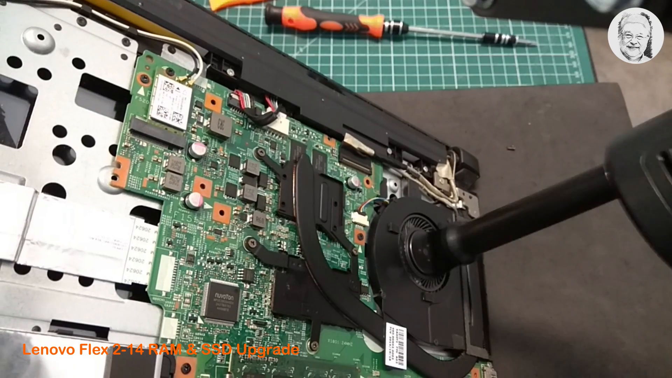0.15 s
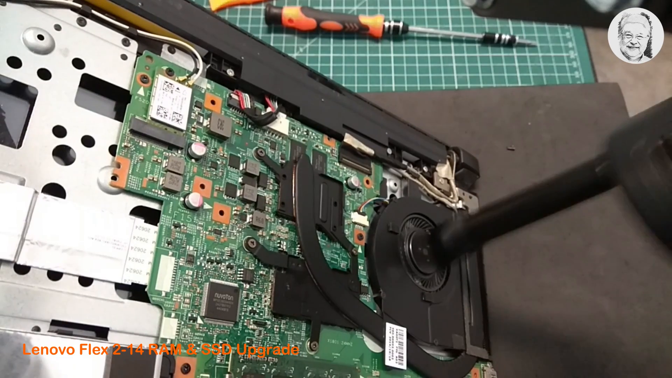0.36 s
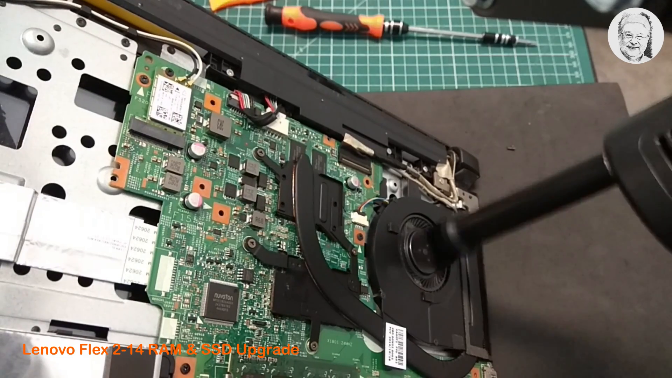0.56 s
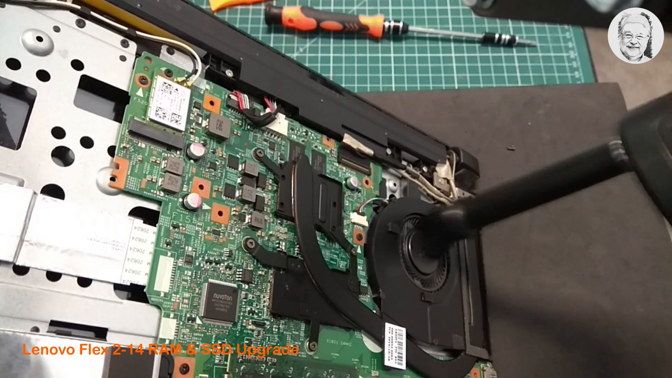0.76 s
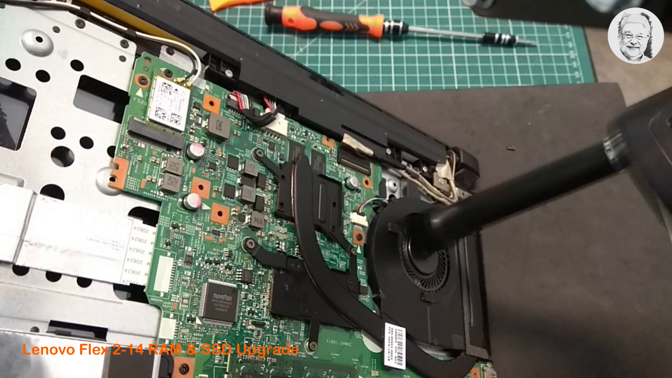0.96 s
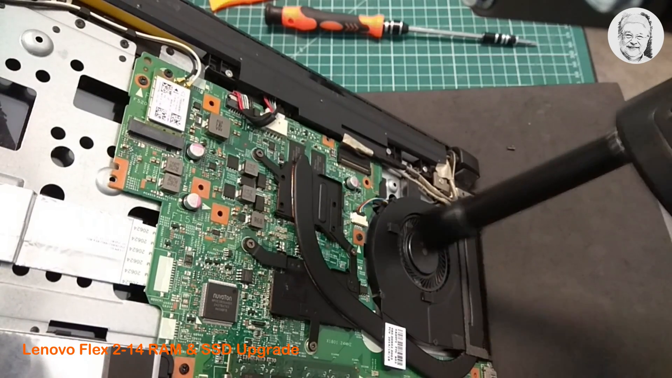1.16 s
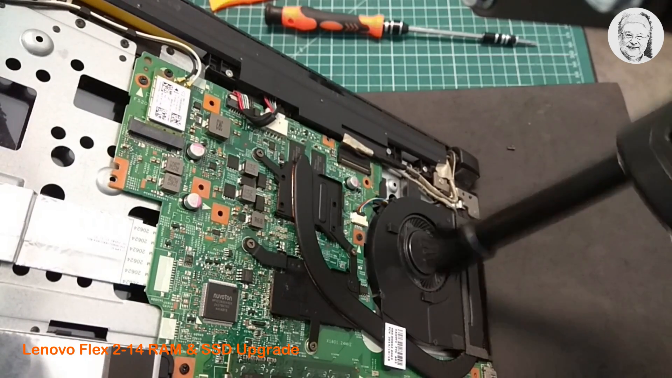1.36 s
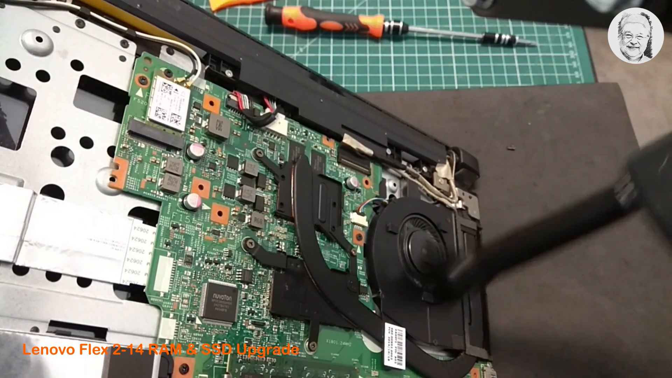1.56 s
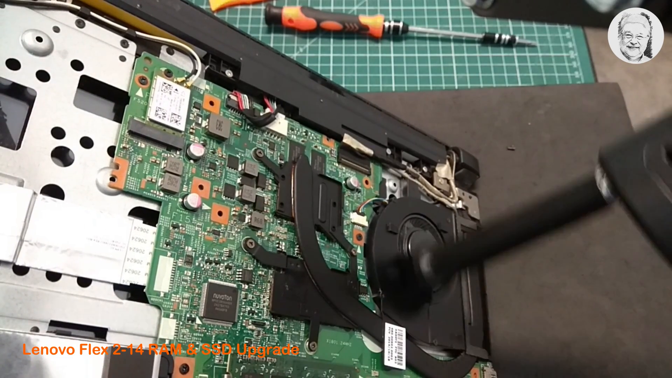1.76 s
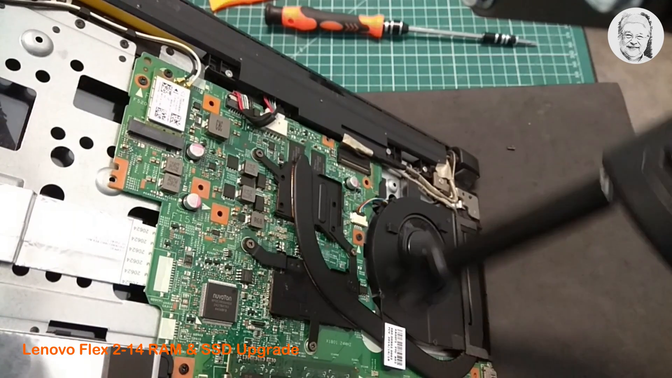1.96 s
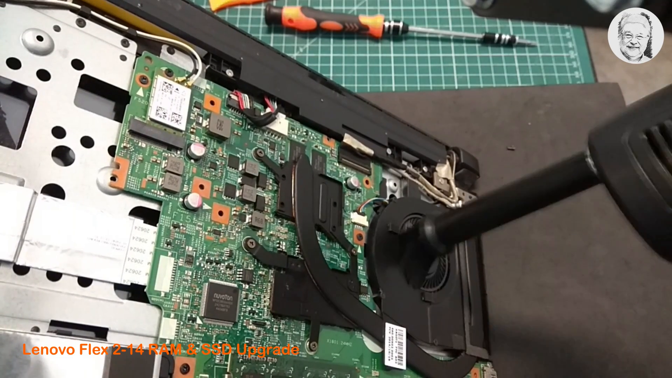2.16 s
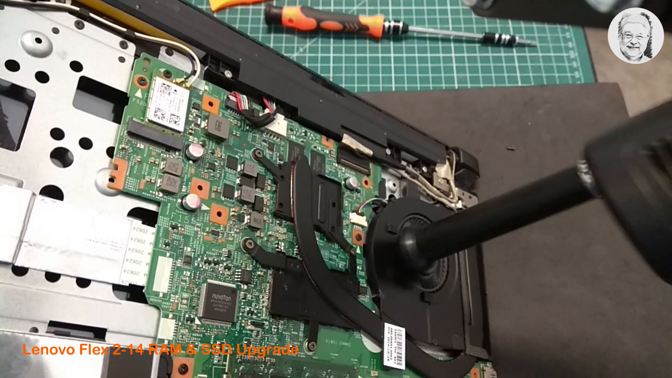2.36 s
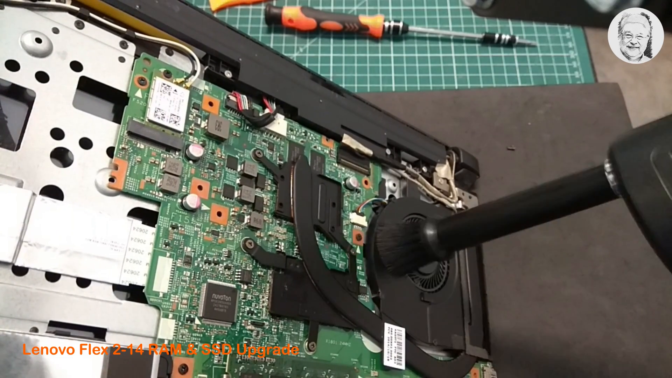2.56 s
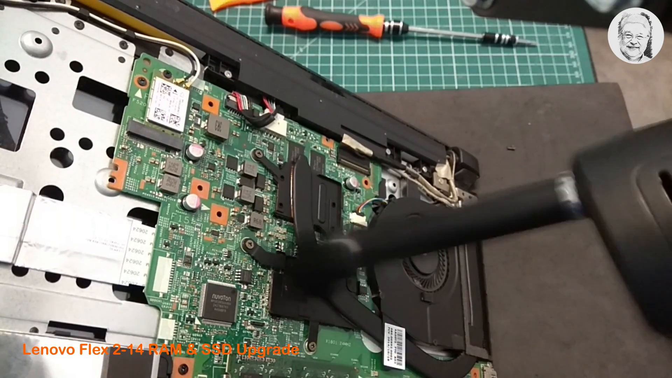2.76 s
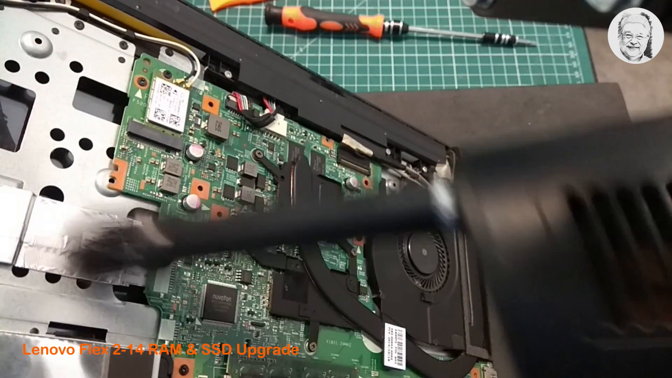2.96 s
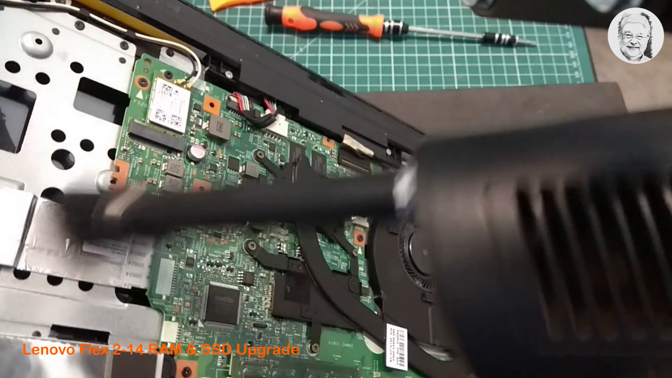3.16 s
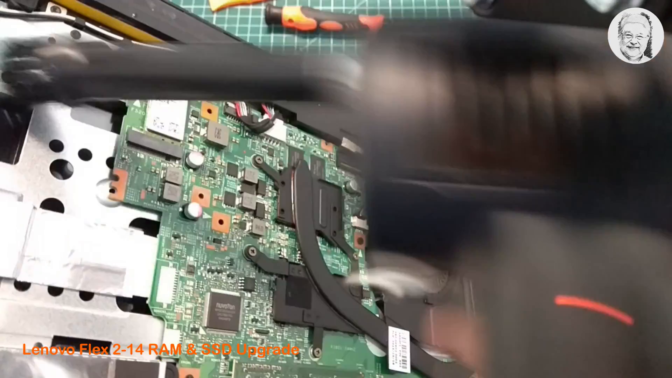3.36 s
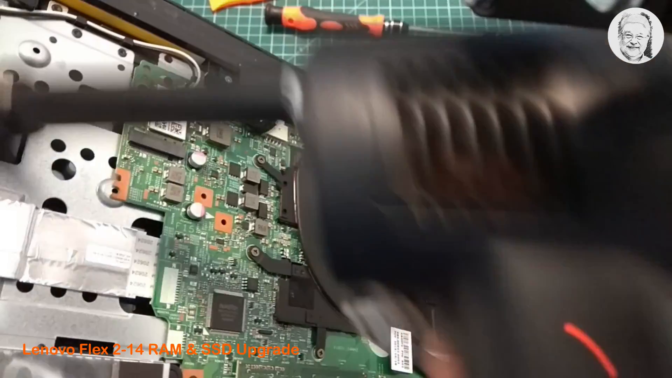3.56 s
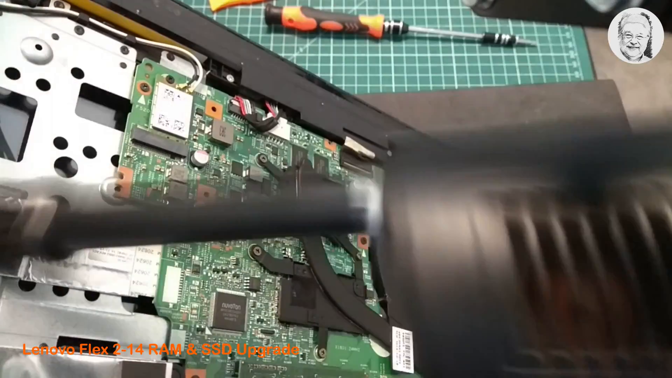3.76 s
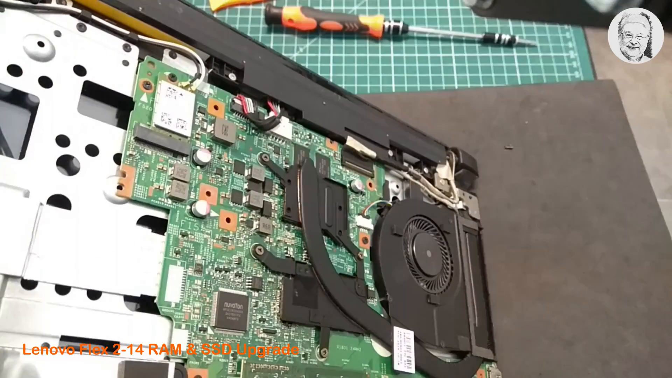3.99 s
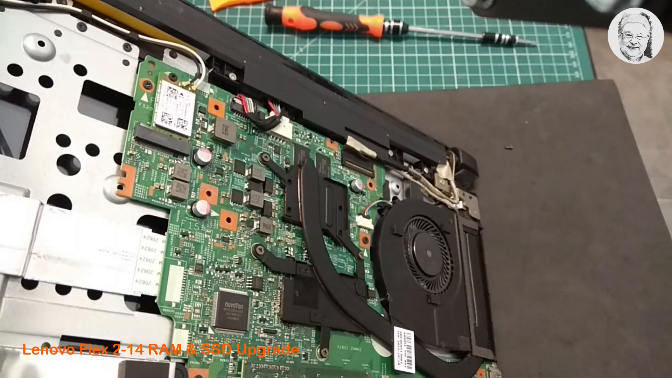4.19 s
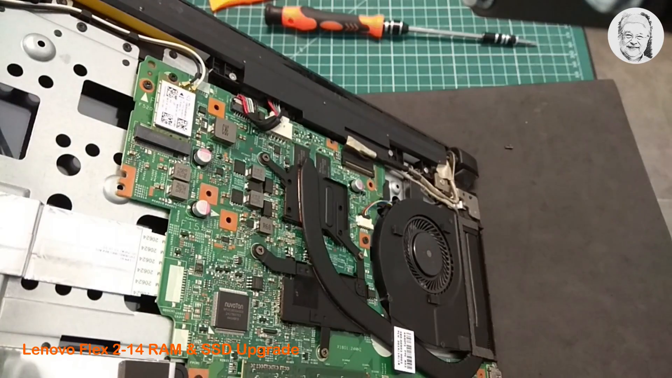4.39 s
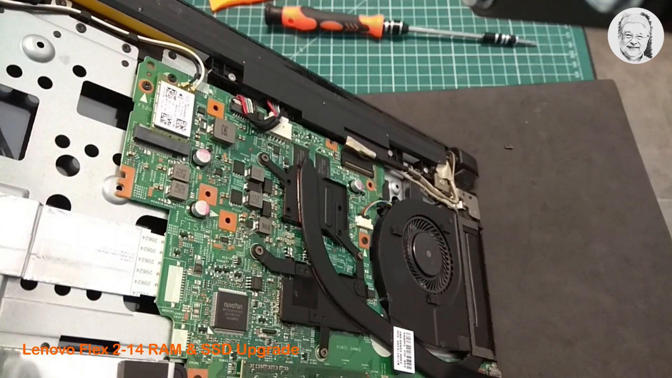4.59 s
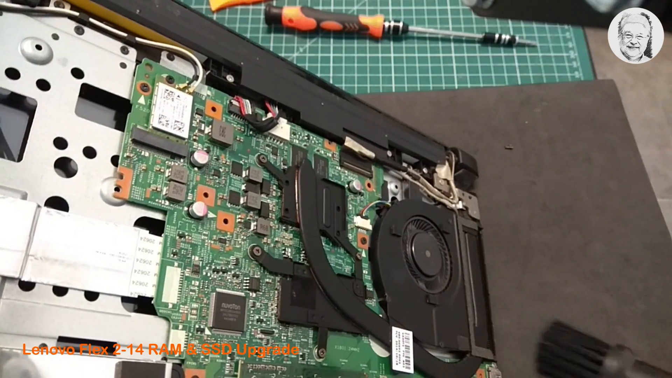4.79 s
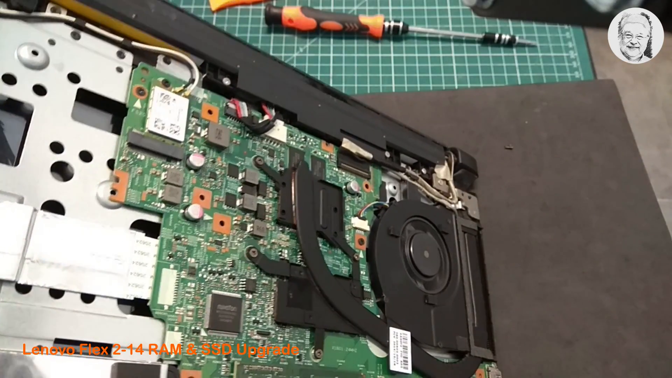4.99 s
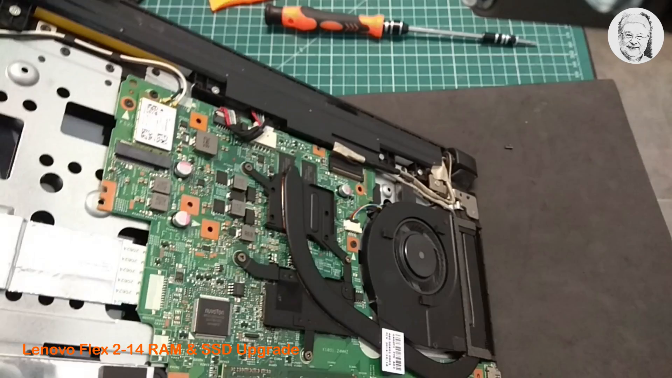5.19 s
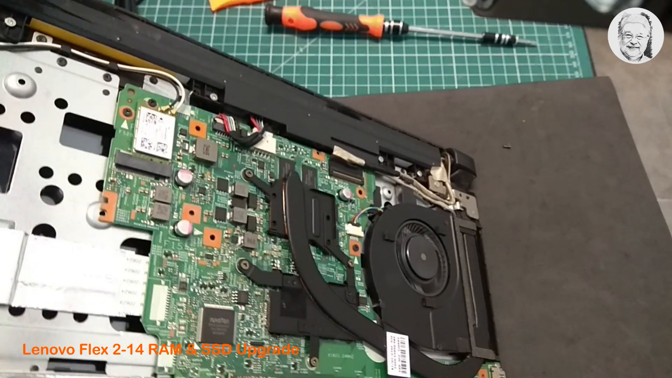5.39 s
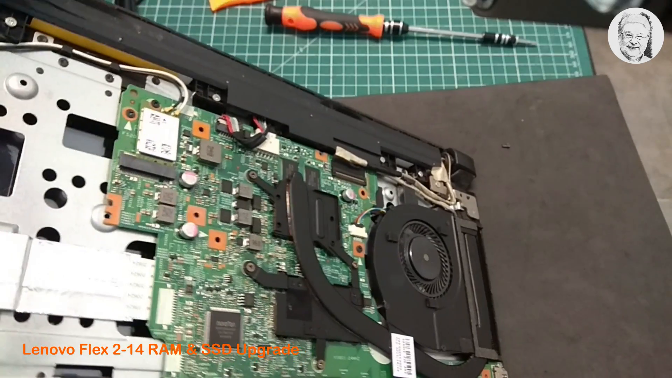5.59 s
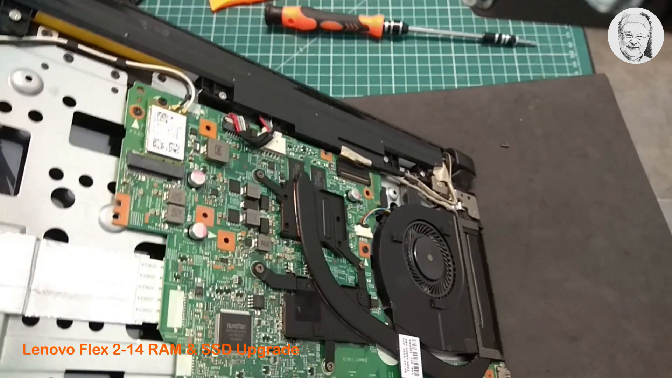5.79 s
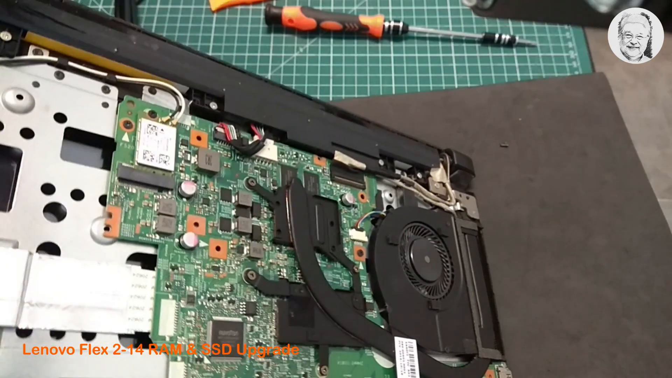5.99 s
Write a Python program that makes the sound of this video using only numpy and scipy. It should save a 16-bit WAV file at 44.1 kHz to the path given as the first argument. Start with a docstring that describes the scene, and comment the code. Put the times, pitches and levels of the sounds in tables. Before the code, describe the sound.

A strong, hissy jet of turbulent air runs continuously, threaded with a very high, slightly wavering motor whine and weaker lower tones. Recorded close in stereo indoors, it shifts between sides and sounds briefly hollow as the blower moves over an opened laptop. Near the end the power cuts, the motor slides down and is braked, and the air dies away, leaving a soft rumble, two minute chirps and two fading whistles.

```python
"""A loud rush of air with a motor whine in it: a hand-held electric blower dusts an opened laptop.
The rush is random noise with a shifting colour; the whine is sines on multiples of the shaft's speed.
The blower is swept across two microphones, drawn back to the side and switched off; its shaft coasts down
and is braked, with a short low rumble, two tiny squeaks and two thin falling whistles (noise and sines)."""
import sys
import numpy as np
from scipy import signal
from scipy.io import wavfile
from scipy.ndimage import uniform_filter1d

SR = 44100
rng = np.random.default_rng(int(sys.argv[2]) if len(sys.argv) > 2 else 0)


def wav_out(sig):
    """Save sig, one row per channel (or a flat mono array), as 16-bit PCM at SR to the path in sys.argv[1]."""
    wavfile.write(sys.argv[1], SR, np.round(np.clip(np.atleast_2d(sig).T, -1, 1) * 32767).astype(np.int16))


N = 266364


def gain_of(db):
    """Turn decibels into a factor on amplitude."""
    return 10 ** (np.asarray(db) / 20)


def evened(x):
    """Scale a signal to rms 1."""
    return x / np.sqrt(np.mean(x ** 2) + 1e-20)


def follow(rows, t):
    """Read every column of a table at the times t, in straight lines between rows."""
    s, *columns = np.transpose(rows)
    return [np.interp(t, s, c) for c in columns]


def wander(t, low_hz, high_hz):
    """Slow random movement of rms 1: sines of random phase, the slower ones larger."""
    total = 0
    for f in np.geomspace(low_hz, high_hz, num=24):
        total = total + np.sin(2 * np.pi * (f * t + rng.random())) / np.sqrt(f)
    return evened(total)


# a short low rumble after switch-off: time_s [s], level_db [dB, average of both sides before it turns lumpy]
RUMBLE_LEVEL = [(5.04, -120), (5.076, -97), (5.088, -74), (5.1, -59), (5.178, -60), (5.204, -47),
                (5.246, -52), (5.334, -72), (5.4, -76)]


def rumble():
    """Lumpy low noise, as from air or a hand brushing the camera, partly shared by both microphones."""
    t = np.arange(N) / SR
    low_band = signal.butter(3, [130, 330], "band", fs=SR, output="sos")
    shared, left, right = signal.sosfilt(low_band, rng.standard_normal((3, N)))
    noise = evened(shared + 1.1 * np.array([left, right]))
    level_db = follow(RUMBLE_LEVEL, t)[0] + 1.8 * wander(t, 31, 55)
    sounding = (t > RUMBLE_LEVEL[0][0]) * (t < RUMBLE_LEVEL[-1][0])
    return noise * gain_of(level_db) * sounding * gain_of([[-1.5], [1.5]])


# tiny high squeaks: start_s [s], peak_db [dB, before the left-right gains], top_pitch_hz [Hz], length_s [s]
SQUEAK_EVENTS = [(5.5872, -57, 11000, 0.016), (5.624, -57, 11100, 0.016)]


def squeaks():
    """Brief chirps, mostly on the right, whose pitch arches up and down while the shaft slows."""
    out = np.zeros(N)
    for start_s, peak_db, top_hz, length_s in SQUEAK_EVENTS:
        u = np.arange(round(length_s * SR)) / (length_s * SR)  # 0 to 1 along the squeak
        arch_hz = top_hz * (1 - 0.11 * (u - .45) ** 2)
        tone = np.sin(2 * np.pi * np.cumsum(arch_hz) / SR)
        out[round(start_s * SR):][:len(u)] += gain_of(peak_db) * np.sin(np.pi * u) * tone
    return out * gain_of([[-12], [3]])


PHASE_EDGE_HZ = 5030  # above this pitch the left-right phase difference is set to zero


def lag_phase(hz, lag_ms):
    """Phase by which the left side trails for a given lag, set to zero above a steep edge."""
    return 2 * np.pi * hz * lag_ms / 1000 / (1 + (hz / PHASE_EDGE_HZ) ** 24)


# the blower's path, also used by the rush: time_s [s], left_lag_ms [ms the left microphone trails, before
# the factors below], treble_likeness [0-1 between sides], treble_db [dB], lean_db [dB, left minus right]
BLOWER_PATH = [(0.0, -0.15, 0.8, -0.5, -0.5), (0.6, -0.16, 0.63, -0.5, -0.5), (1.0, -0.17, 1, -2.5, 0),
               (2.0, -0.16, 0.7, -3.5, 0), (2.8, -0.13, 0.2, 1, 2), (3.0, 0.032, 0, 4.5, 3.5),
               (3.5, 0.11, 0.8, -0.5, -0.5), (4.0, -0.025, 0.2, 2.5, -2), (4.2, -0.14, 0, 2, 0.5),
               (4.4, -0.13, 0.9, 4, -0.5), (4.7, -0.36, 0.2, -0.5, -1), (5.05, -0.195, 0.1, 0, -3.5),
               (5.25, -0.47, 0, 3.5, -1.5), (5.32, 0.5, 0.7, 3.5, -0.5), (5.64, 0.45, 0.5, -3.5, 4),
               (5.74, 0.46, 0.1, 13, -2), (6.04, 0.43, 0.16, -6, -2)]
BEAT_HZ = 7.6  # average; it wanders


def whine(t, hz, levels_db, partials, waver=3, unsteady=0.00013, far_right_db=0, halo=0.2, halo_hz=40):
    """Sines on multiples of a slightly unsteady pitch, each beating and wavering at each microphone."""
    hz = hz * (1 + unsteady * wander(t, 8.6, 57))
    lag_ms, turns = follow(BLOWER_PATH, t)[0], np.cumsum(hz) / SR
    at_speed = np.clip(12 * hz / hz[0] - 11, 0, 1)  # 1 at the first pitch, 0 once a twelfth lower
    waver_db = waver * (0.64 + 0.48 * at_speed)
    # far to the right the left microphone hears less
    swing_db = far_right_db * np.clip(lag_ms / 0.26, 0, 1) ** 2
    beat_hz = BEAT_HZ * (1 + 0.36 * wander(t, 1.5, 6.5))
    beat = at_speed * np.exp(2j * np.pi * np.cumsum(beat_hz) / SR)
    smooth = signal.butter(3, halo_hz, fs=SR, output="sos")
    out = np.zeros((2, N))
    for (order, lean_db, lag_factor, share), db in zip(partials, levels_db):
        tone = np.exp(2j * np.pi * order * turns)
        tone = tone * (1 + share * beat) / np.sqrt(1 + (share * at_speed) ** 2)
        lean_db = lean_db + swing_db
        lean_balance = np.sqrt(np.cosh(lean_db * np.log(10) / 20))  # leaning leaves the total power alone
        blur = signal.sosfilt(smooth, rng.standard_normal((2, 2, len(t))))  # turbulence smears each line
        for side, trail in enumerate((lag_phase(order * hz, lag_factor * lag_ms), 0)):
            level_db = db + (.5 - side) * lean_db + waver_db * wander(t, 3.3, 25)
            size = gain_of(level_db) / lean_balance
            smear = 1 + halo * evened(blur[side, 0]) + 1j * halo * evened(blur[side, 1])
            smear = smear / np.sqrt(1 + 2 * halo ** 2)
            heard = (tone * np.exp(-1j * trail) * smear).real
            out[side, round(t[0] * SR):][:len(t)] += np.sqrt(2) * size * heard
    fade = np.interp(np.arange(N) / SR, [t[0] - 1e-3, t[0] + .02, t[-1] - .02, t[-1]], [0, 1, 1, 0])
    return out * fade


# the two whistles, lower then upper: multiple [times the upper whistle's pitch], lean_db [dB, left minus right],
# lag_factor [times the left lag], beat_share [0-1, strength of a close neighbour tone near the first pitch]
WHISTLE_TONES = [(0.556, -3, 0.96, .05), (1, -4, 0.59, .05)]
# swell of the lower, then the upper whistle: loudest_s [s], level_db [dB], rise [dB per s], fall [dB per s]
WHISTLE_SWELLS = [(5.93, -62, 400, 10), (5.8, -61, 130, 45)]
WHISTLE_START_S, WHISTLE_HZ, WHISTLE_SLOWING_PER_S = 5.62, 3541, 1.11


def whistles():
    """Two thin tones that fall together at the end of the coasting, slowing by drag."""
    t = np.arange(round(WHISTLE_START_S * SR), N) / SR
    hz = WHISTLE_HZ * np.exp(-WHISTLE_SLOWING_PER_S * (t - WHISTLE_START_S))
    levels_db = []
    for loudest_s, db, rise, fall in WHISTLE_SWELLS:
        before, after = np.maximum(loudest_s - t, 0), np.maximum(t - loudest_s, 0)
        levels_db.append(db - rise * before - fall * after)
    return whine(t, hz, levels_db, WHISTLE_TONES, waver=4, unsteady=.002, halo=0.15, halo_hz=80)


# shaft speed, drifting a little under load, then coasting and braked: time_s [s], turns_hz [Hz]
SHAFT_SPEED = [(0.0, 468.9), (0.55, 469.4), (1.3, 468.5), (1.7, 469.2), (2.35, 469.4), (3.1, 468.7),
               (3.9, 468.5), (4.4, 468.8), (4.55, 469.5), (4.8, 468.0), (4.97, 468.0), (5.06, 455.5),
               (5.21, 416.5), (5.3, 381.5), (5.46, 341.5), (5.51, 313.5), (5.56, 272), (5.63, 236)]
# tones of the shaft: order [multiple of its speed], lean_db [dB, left minus right], lag_factor [times the left
# lag], beat_share [0-1, strength of a close neighbour tone that beats with it under power]
SHAFT_TONES = [(1, 14.5, 1.2, 0.3), (2, 3.5, 2.45, 0.25), (3, 4.5, 0.42, 0.47), (10, 5.5, 1.27, 0),
               (20, -19, 1.1, 0.3)]
# whine as the housing turns, then as each order coasts down through the housing's resonances:
# time_s [s], then level_db [dB] of shaft orders 1, 2, 3, 10 and 20
WHINE_LEVELS = [(0.0, -66, -50, -70, -43, -37.5), (0.35, -66, -51.5, -62, -44, -36),
                (0.65, -63, -50, -64, -43, -39), (1.1, -58, -49, -58, -43, -39.5),
                (1.4, -66, -48.5, -62, -41, -37.5), (1.7, -67, -50, -53, -39.5, -41),
                (2.05, -61, -51, -55, -41.5, -39), (2.3, -68, -49, -55, -42, -34),
                (3.15, -66.5, -53, -60, -46, -32.5), (3.5, -63, -52, -60, -47.5, -41),
                (3.77, -62, -53, -53.5, -44, -34), (4.3, -53, -55.5, -59, -45.5, -34.5),
                (4.5, -57.5, -54, -58, -45, -34.5), (4.75, -65, -54, -56.5, -46.5, -33),
                (4.96, -59, -53, -52, -44, -35), (5.07, -51, -54, -61, -47, -41),
                (5.17, -61, -53, -52, -46, -54), (5.28, -61, -47, -42, -66, -72),
                (5.38, -62, -51.5, -49.5, -66, -85), (5.46, -63, -53.5, -61, -78, -90),
                (5.535, -76, -55, -76, -68, -95), (5.575, -91, -57, -86, -43, -99),
                (5.62, -99, -67, -86.5, -67, -99)]


def motor():
    """Motor and impeller: tones on multiples of the shaft's speed, falling as it coasts down."""
    t = np.arange(round(SHAFT_SPEED[-1][0] * SR)) / SR
    speed_hz = follow(SHAFT_SPEED, t)[0]
    return whine(t, speed_hz, follow(WHINE_LEVELS, t), SHAFT_TONES, waver=2.2, far_right_db=-12)


RUSH_DB, OFF_S, QUIET_DB = -26.5, 5.05, -80.5  # level while on, switch-off time, lowest level
SAG_DB_PER_S, SAG_DB_PER_S2 = 13, 48.5


def rush_db(t):
    """Level of the jet: it holds, then dies ever faster after switch-off."""
    since = np.maximum(t - OFF_S, 0)
    return np.maximum(RUSH_DB - SAG_DB_PER_S * since - SAG_DB_PER_S2 * since ** 2, QUIET_DB)


# narrow peaks and dips in the colour of the rush: pitch_hz [Hz], width_hz [Hz], held_strength (at the fan or
# drawn back) and swept_strength [dB before the factor of 1.5 or more]
NARROW_PEAKS = [(334, 67, 6, 6), (1260, 120, 3.5, 3.5), (1866, 205, 4, 2), (2592, 270, 4, 3.5),
                (3120, 260, -5, -3), (3690, 81, 2, 1), (4275, 180, 3, 1), (4960, 220, -6, -2),
                (6550, 200, 3.5, 1.5)]


def narrow_colour_db(t, hz, swept):
    """Narrow peaks and dips in the rush; the weaker the jet, the more they stand out."""
    prominence = 1.5 + 0.012 * (RUSH_DB - rush_db(t))
    total = 0
    for f, width, held, swept_strength in NARROW_PEAKS:
        strength = held + swept * (swept_strength - held)
        total = total + strength / (1 + (2 * (hz - f) / width) ** 2)
    return prominence * total


# moments when the upper mids are opposite in phase left and right and the centre sounds hollow:
# middle_s [s], length_s [s], pitch_hz [Hz], width_hz [Hz]
HOLLOW_MOMENTS = [(0.17, .06, 3600, 900), (0.7, .09, 3500, 1000), (0.92, .07, 3500, 1000),
                  (1.42, .07, 3300, 500), (2.17, .06, 3600, 500), (2.34, .05, 3700, 500),
                  (2.63, .11, 3100, 800), (2.72, .13, 3900, 1500), (4.26, .09, 3700, 1100),
                  (4.3, .12, 4000, 500), (4.41, .06, 3300, 600), (4.45, .09, 2100, 400),
                  (4.65, .15, 1780, 200)]
OPPOSED_WIDTH = .8  # radians from opposition within which random patches also turn hollow


def hollow_patches(t, hz, lag_ms, swirl):
    """How far (0-1) left and right are opposite in phase at each pitch and moment."""
    listed = np.max([np.exp(-(2 * (t - s) / length) ** 10 - (2 * (hz - f) / width) ** 10)
                     for s, length, f, width in HOLLOW_MOMENTS], axis=0)
    opposed = np.exp(-((lag_phase(hz, lag_ms) + np.pi) / OPPOSED_WIDTH) ** 4) * (hz > 2900)
    return np.clip(np.maximum(2 * listed, 3 * opposed * (swirl - .9)), 0, 1)


def smoothed(x, hz_bins, frames):
    """Blur random values over pitch and time into patches of rms 1."""
    return evened(uniform_filter1d(uniform_filter1d(x, size=hz_bins, axis=-2), size=frames, axis=-1))


# colour of the rush: pitch_hz [Hz], then left_db and right_db [dB, relative] for each of six poses:
# at the fan, swept across, returning, drawn back, slowing, nearly still
POSE_COLOURS = [(80, -71.5, -40, -70.5, -35, -65, -37.5, -72, -40.5, -60, -59.5, -36, -36.5),
                (143, -67, -50, -66.5, -31, -61, -41, -63, -50, -57, -57, -32, -26),
                (226, -32.5, -34, -45, -40, -28, -40, -31, -40, -28, -35, -26.5, -25),
                (323, -18.5, -22, -29, -32.5, -18, -27.5, -14, -24, -25, -15, -21, -27),
                (451, -17, -11.5, -19, -8, -17, -9, -15, -13.5, -15, 0, -21.5, -16.5),
                (676, -16.5, -13, -22, -14.5, -16, -10, -17, -12.5, -2.5, -4.5, -10, -9),
                (813, -11, -17, -12.5, -12, -6.5, -15, -4.5, -19, -3.5, -8, -18, -13),
                (1027, -6, -12.5, -8, -10, -9.5, -7, -6, -8.5, -16, 3, -16, -18),
                (1274, -6, -7, -8, -0.5, -3, -0.5, 1, -7, 1.5, 3, 2.5, 6),
                (1560, -2, -3.0, -7, -6, -6, -1, 2, -2.5, -10, -2, -19, -23),
                (1866, -0.5, 0.5, -9, 1, 1.5, 0, -6, -8.5, -8.5, -7.5, -17.5, -8.5),
                (2134, -3, -5, 0.5, -2.5, -2.5, -1.5, 5.5, -1, -10, -3, -38, -20),
                (2544, 1, -5.5, -10, -2, -2, -4.5, -2.5, -9.5, -7, 1.5, 1, -11.5),
                (2980, 1, 1, -1.5, 2, 3.5, -2, 4.5, 1.5, -5, -4, -1, 7),
                (3580, 2, 5.5, -4, 3.5, -14, 4.5, 1.5, -4, 0, 2, -17, -20),
                (3700, 0, 0, 2, 0.5, 7.5, -3.5, 1, 2, -6, -2, -20, 2.5),
                (4280, 0, 4.5, -2.5, 2, -1, 6, 2, -6.5, -10, -3, -9, -5),
                (4700, 0, 0.5, -5.5, 4.5, -19, 0.5, 1, -5, -12, -3, -33, -24),
                (5640, 0, 4, -3, 1.5, 7.5, 3, 1.5, 0, 0, 6, -10, -11),
                (5900, 1.0, -3, -5, -4.5, -2.5, 3, -2.5, 0, -8, -4, -32, -13),
                (7270, -4.5, 6, -7.5, 4, -8.5, 2.5, 4, 5.5, -10, 3, -34, -24.5),
                (7960, 3.5, 4, -12, 2, -7.5, 4, -14, 4, -13.5, -2, -30, -21.5),
                (8750, -1, 7, -12, 6.5, -9, 5.5, 2, 8, -6.5, 8.5, -31.5, -17.5),
                (10200, 3, 7, -14, 9, -16, 7.5, -6, 8.5, -15, -1.5, -36, -25),
                (11280, -6, 4, -16, 3, -9, -0.5, -3, 0.5, -14.5, -5, -35, -27),
                (12670, 2.5, 1.5, -9, 1, -7.5, 5, -6, -2.5, -16.5, -2, -37, -29.5),
                (13500, -12, 0, -14, 3.5, -14, -2, -17, -1, -34, -8, -37, -27),
                (15100, -11.5, 1.5, -29.5, -5, -19, -6.5, -13, -5.5, -24, -8, -38, -30),
                (16700, -13, -3, -30, -3, -22, -3, -19, -8, -62.0, -56, -37, -36.5),
                (15600, -22, -32, -42, -1, -24, -0.5, -22, -3, -61, -61, -41, -38)]
# which pose when: time_s [s], pose_number [0-5, in the order above]
POSE_TIMES = [(0, 0), (2.5, 0), (3.1, 1), (3.55, 1), (3.75, 2), (4.35, 2), (4.6, 3), (5.0, 3), (5.4, 4),
              (5.6, 4), (5.8, 5)]
# around this pitch the rush's left lag is shorter: pitch_hz [Hz], width_hz [Hz], share_lost [0-1]
SHORTER_LAG = (2600, 900, .45)
LIKENESS = 0.72  # left-right likeness of the lower rush, 0-1
GAP_HZ, GAP_WIDTH_HZ, GAP_DB = 4800, 5000, 28


def rush():
    """Turbulent air: random short-time spectra with the colour of each pose, in drifting patches."""
    frames, hz = N // 256 + 5, np.fft.rfftfreq(1024, 1 / SR)[:, None]
    t = np.arange(frames) * 256 / SR
    lag_ms, treble_same, bright_db, lean_db = follow(BLOWER_PATH, t)

    # blend the colours of neighbouring poses, then add narrow peaks, treble and lean
    log_rows = [(np.log(f), *db) for f, *db in POSE_COLOURS]
    poses = np.reshape(follow(log_rows, np.log(hz[:, 0] + 1)), (-1, 2, len(hz)))
    pose_number = follow(POSE_TIMES, t)[0]
    share = np.maximum(1 - abs(pose_number - np.arange(len(poses))[:, None]), 0)
    colour_db = np.einsum("pcf,pt->cft", poses, share)
    narrow_db = narrow_colour_db(t, hz, share[1] + share[2])
    treble = 1 / (1 + (6500 / (hz + 1)) ** 6)
    colour_db += narrow_db + treble * bright_db + np.array([.5, -.5])[:, None, None] * lean_db
    colour = gain_of(colour_db)
    colour /= np.sqrt((colour ** 2).mean((0, 1)))

    a, b, c, d, left_patch, right_patch, gap_chance, swirl = rng.standard_normal((frames, 513, 8)).T
    swirl = smoothed(swirl, 7, 11)
    gap_chance = smoothed(gap_chance, 4, 11)
    patches = smoothed(np.array([left_patch, right_patch]), 4, 9)
    # random brief narrow gaps in the upper mids, deeper where the narrow colour is weak
    gap_depth = np.clip(3 * (gap_chance - 1.25 - .1 * narrow_db), 0, 1)
    gaps_db = -GAP_DB * gap_depth / (1 + (2 * (hz - GAP_HZ) / GAP_WIDTH_HZ) ** 4)
    # the very faint bass switches irregularly on and off
    bass = 1 / (1 + (hz / 230) ** 6)
    bass_flicker_db = 16 * bass * (np.tanh(2 * wander(t, 2.5, 16)) - .4)
    gusts_db = .5 * wander(t, 2.2, 30)

    # the left side is partly the right side's noise with a lag, partly its own
    hollow = hollow_patches(t, hz, lag_ms, swirl)
    same = np.clip(LIKENESS + treble * (treble_same - LIKENESS), 0, 1)
    same = same + hollow * (1 - same)
    short_hz, short_width_hz, share_lost = SHORTER_LAG
    shortening = 1 - share_lost * np.exp(-(2 * (hz - short_hz) / short_width_hz) ** 2)
    trail = lag_phase(hz, lag_ms) * shortening
    trail = trail - hollow * (np.pi + trail)  # hollow patches move to half a turn apart
    colour = colour + hollow * (colour.mean(0) - colour)
    right = a + 1j * b
    left = same * right * np.exp(-1j * trail) + np.sqrt(abs(1 - same ** 2)) * (c + 1j * d)

    patchy_db = 2.2 * patches * (1 - hollow)
    moving_db = patchy_db + gusts_db + bass_flicker_db + gaps_db
    spectra = np.array([left, right]) * colour * gain_of(moving_db)
    air = evened(signal.istft(spectra, nperseg=1024, noverlap=768)[1][:, :N])
    return air * gain_of(rush_db(np.arange(N) / SR))


def scene():
    """All the layers together, left and right."""
    return rumble() + squeaks() + whistles() + motor() + rush()


EDGE_HZ = 15760


def record(dry):
    """The recorder's band limit: a low-pass filter removes the highest treble."""
    low_pass = signal.firwin(511, EDGE_HZ, window=("kaiser", 9), fs=SR)
    return signal.oaconvolve(dry, low_pass[None], "same")


dry = scene()
out = record(dry)
wav_out(out)
```